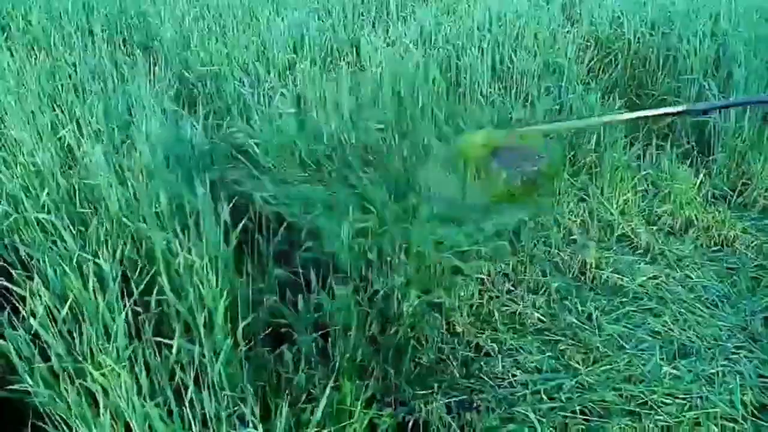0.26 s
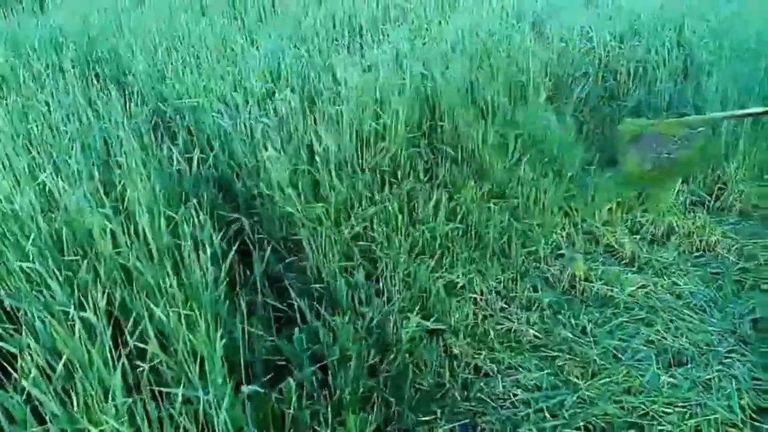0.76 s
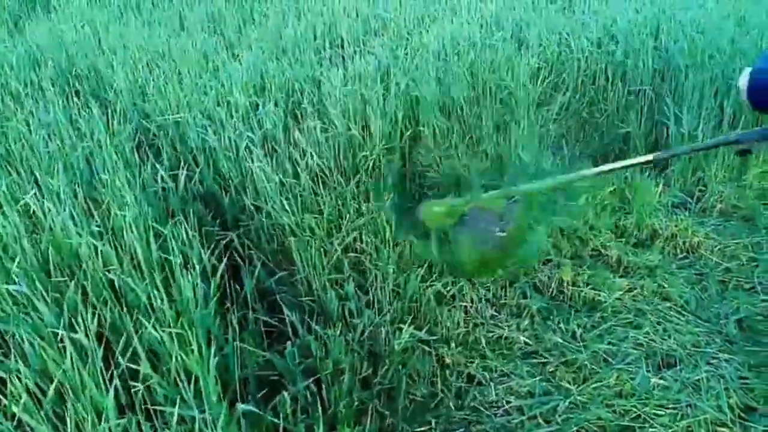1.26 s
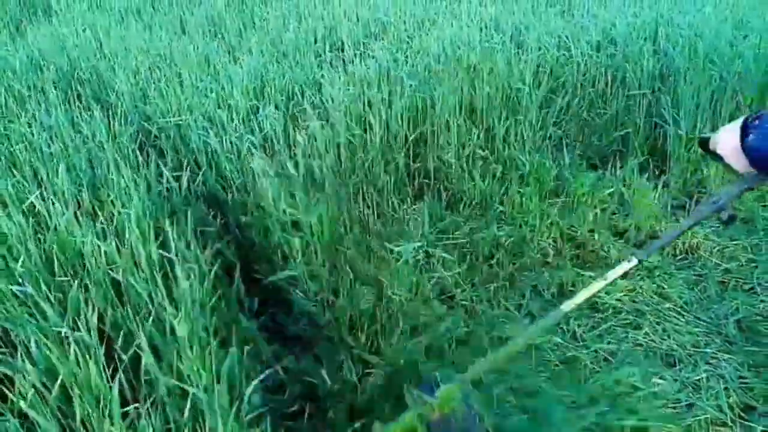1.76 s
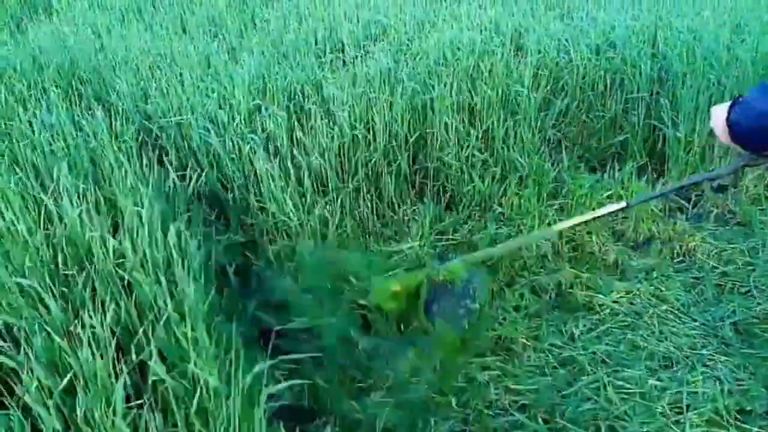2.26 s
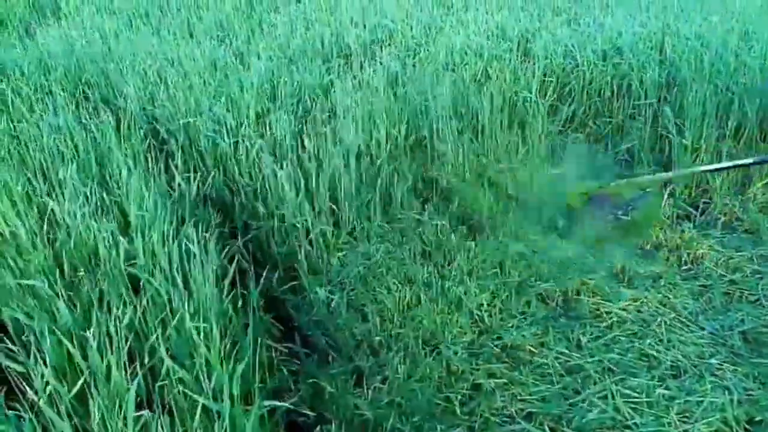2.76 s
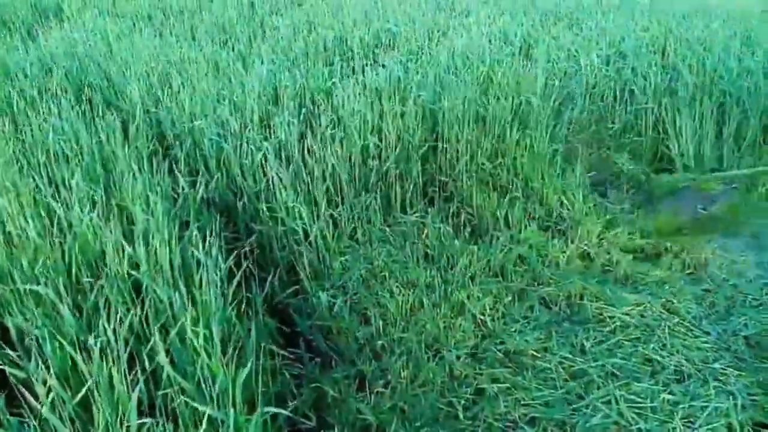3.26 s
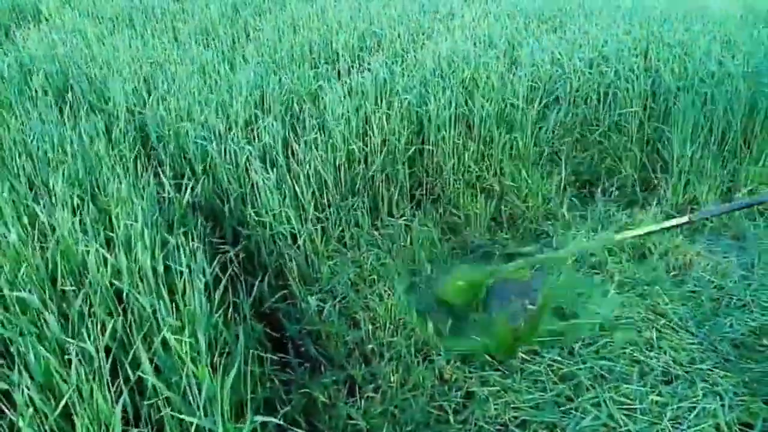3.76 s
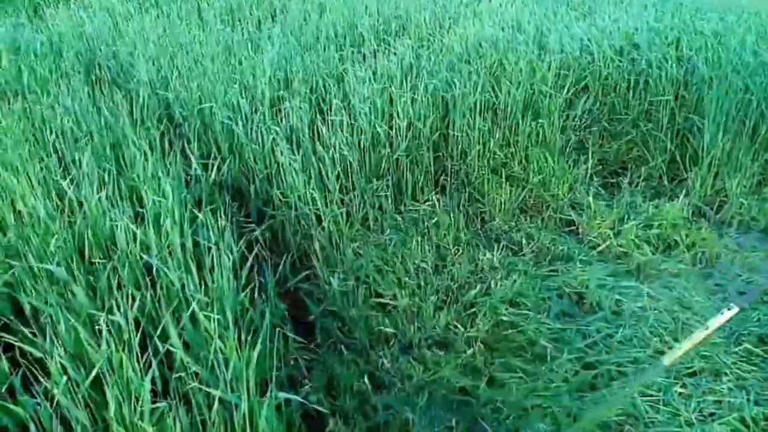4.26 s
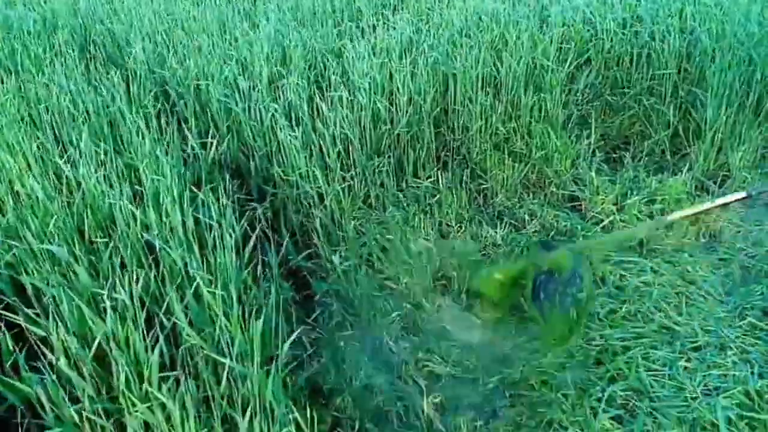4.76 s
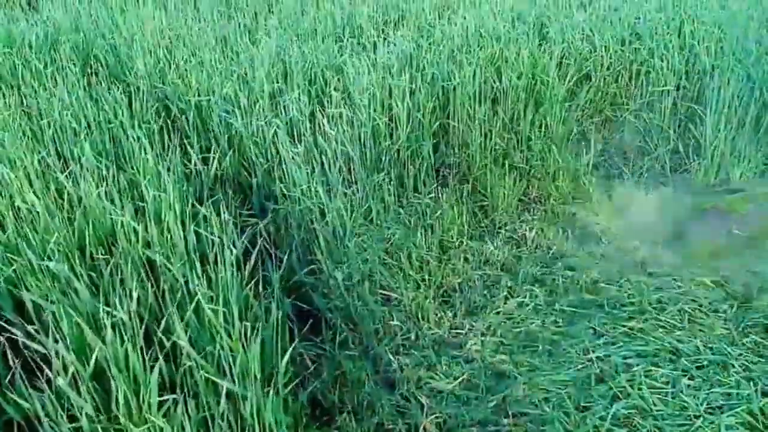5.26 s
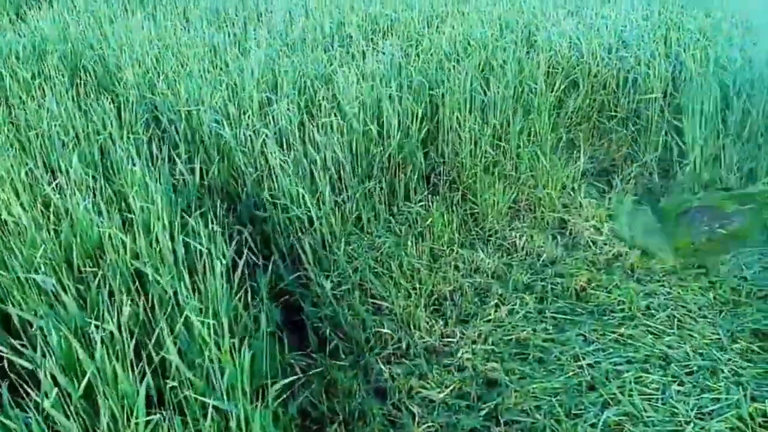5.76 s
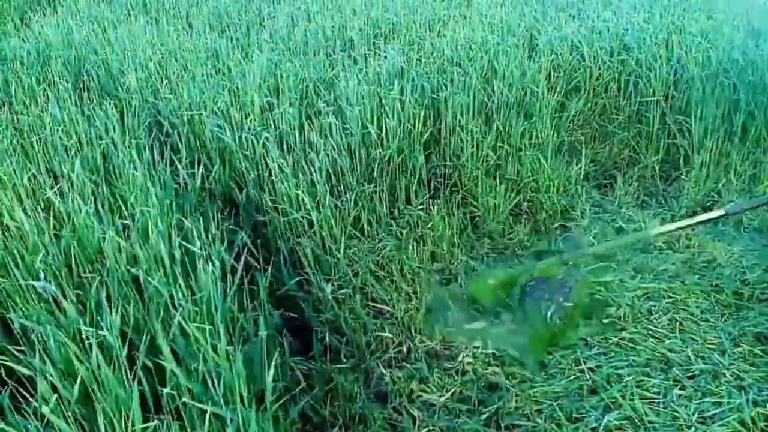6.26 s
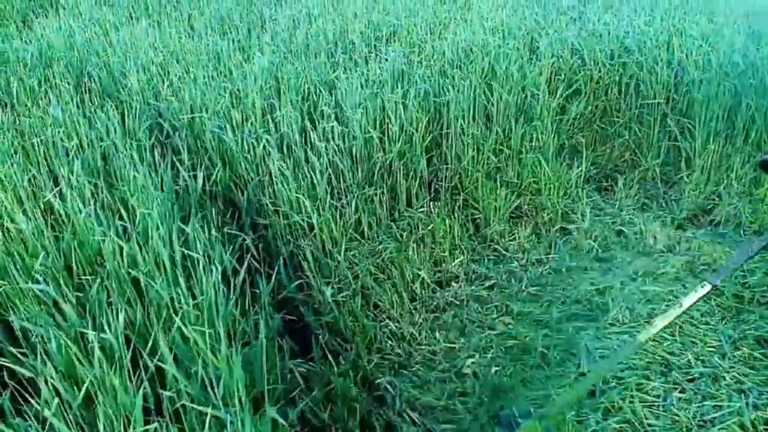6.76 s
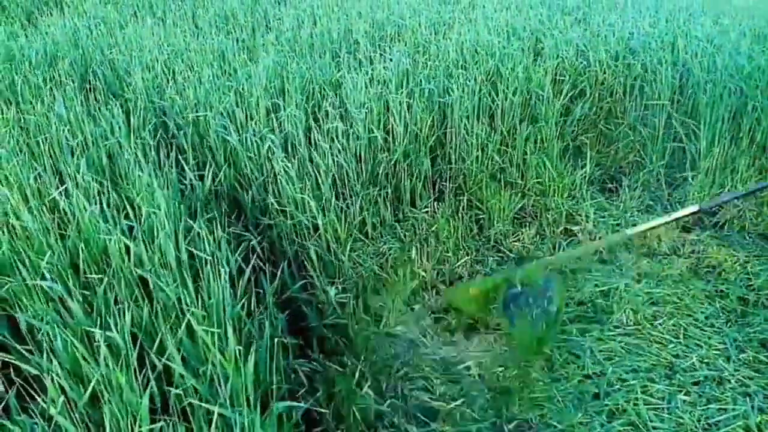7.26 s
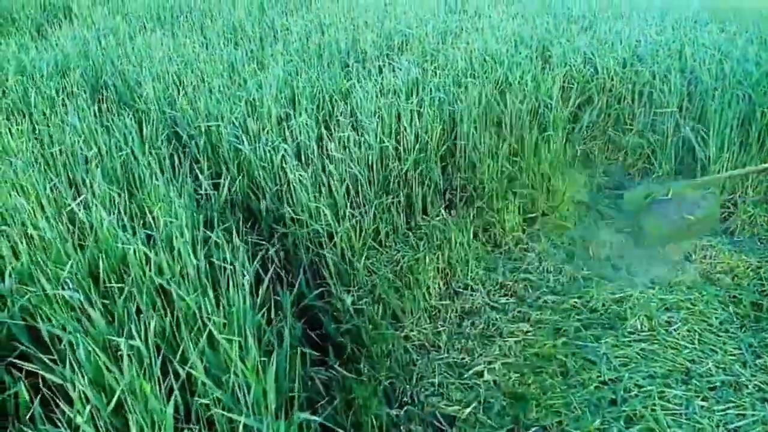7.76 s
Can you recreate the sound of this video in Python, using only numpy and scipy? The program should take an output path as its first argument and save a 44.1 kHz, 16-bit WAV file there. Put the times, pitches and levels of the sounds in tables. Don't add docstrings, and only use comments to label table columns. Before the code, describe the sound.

An electric string trimmer sweeps through tall wet grass, a throbbing bright hiss over a wavering hum, with scraps ticking and thumping close to the microphone.

```python
import sys
import numpy as np
from scipy import signal
from scipy.io import wavfile
from scipy.ndimage import uniform_filter1d

SR = 44100
rng = np.random.default_rng(int(sys.argv[2]) if len(sys.argv) > 2 else 0)


def to_wav(s):
    ch = np.atleast_2d(s).T
    pcm = np.round(np.clip(ch, -1, 1) * 32767)
    wavfile.write(sys.argv[1], SR, pcm.astype(np.int16))


def to_linear_factor(level_db):
    exponent = np.asarray(level_db, float) / 20
    return 10 ** exponent


N = 354123
FRAME = 512


def hiss(turns, t, near, lead, trim_db, rustle_db, pan_db):
    # pitch_hz, far_level [dB per Hz], near_level [dB per Hz]
    left_colour = [(40, -113, -92), (96, -70, -87), (390, -75, -65), (1100, -73.5, -69.5), (2110, -67, -60),
                   (2630, -70.5, -60), (4190, -67, -60.5), (5500, -66, -63), (6440, -66, -51),
                   (6630, -70.5, -58), (9460, -67.5, -62), (10180, -70, -70.5), (12100, -100, -87.5),
                   (16000, -110.5, -113)]
    right_colour = [(40.3, -115, -92), (101.5, -62, -60), (460, -71.5, -62.5), (1150, -70.5, -64.5),
                    (1950, -65.5, -60.5), (3810, -65.5, -59), (5240, -60, -50), (5800, -60.5, -50),
                    (6480, -57, -50.5), (7320, -62.5, -58), (8770, -61, -55.5), (10330, -69, -63.5),
                    (13740, -70, -64.5), (14930, -57.5, -54.5)]
    # pitch_hz, far_likeness [0-1], near_likeness [0-1], far_twist_rad
    likeness = [(60, .5, .5, 0), (300, .75, .7, 0), (1500, .78, .7, -.3), (2300, .65, .72, -1.4),
                (2950, .4, .6, .3), (3400, .4, .35, .6), (4300, .62, .42, 1), (5000, .62, .4, 0),
                (6300, .55, .45, -1), (7000, .3, .25, 0), (8000, .58, .15, 1), (9800, .45, .1, -.5)]
    # pitch_hz, share [0-1]
    throb_share = [(300, 0.75), (2200, 0.21), (5500, 0.38), (9000, 0.47), (12000, 0), (15000, 0.4)]
    # far_hz, near_hz, width_hz, level_db
    left_shadows = [(3200, 3300, 160, -5), (6950, 8200, 350, -7), (2700, 4700, 250, -4)]
    right_shadows = [(4300, 3200, 600, -3), (5700, 7500, 400, -3), (10100, 10600, 350, -3),
                     (12100, 13600, 500, -3)]
    lead_low, lead_high = 34, 43

    noise = rng.standard_normal((4, N))
    gate = lashes(turns, near)
    f, s, z = to_spectrum(np.array([noise[0], noise[1] * gate, noise[2], noise[3] * early(gate, lead)]))
    hz = f[:, None]
    throb = np.clip(across(throb_share, f), 0, 1)
    right = np.sqrt(1 - throb) * z[0] + np.sqrt(throb) * z[1]
    left_own = np.sqrt(1 - throb) * z[2] + np.sqrt(throb) * z[3]

    def at_frames(curve):
        return np.interp(s, t, curve)[None]

    swung = at_frames((lead - lead_low) / (lead_high - lead_low))
    far_alike, near_alike = across(likeness, f), across(likeness, f, column=2)
    alike = np.clip(far_alike + swung * (near_alike - far_alike), 0, 1)
    phase = 2 * np.pi * hz * at_frames(lead) / SR + (1 - swung) * across(likeness, f, column=3)
    left = alike * right * np.exp(1j * phase) + np.sqrt(1 - alike ** 2) * left_own

    low = 1 / (1 + (hz / 2200) ** 4)
    airy = 1 / (1 + (7000 / (hz + 1)) ** 6)
    swell = at_frames(trim_db) + (low * 0.89 - airy * 0.13) * at_frames(rustle_db - rustle_db.mean())
    band = np.minimum(np.log2(f / 60 + 1) * 3, 26).astype(int)
    swell = swell + 1.1 * walk(80, (1, len(s))) + 1.4 * walk(70, (27, len(s)))[band]
    sway = (0.5 - low) * at_frames(pan_db - pan_db.mean())

    def at_microphone(side, colour_table, shadows, lean):
        far, close = across(colour_table, f), across(colour_table, f, column=2)
        colour = far + at_frames(near) * (close - far)
        for far_hz, near_hz, width_hz, db in shadows:
            centre_hz = far_hz + swung * (near_hz - far_hz)
            colour = colour + db * np.exp(-((hz - centre_hz) / width_hz) ** 2)
        flicker = 0.9 * walk(50, (27, len(s)))[band]
        return side * to_linear_factor(colour + swell + flicker + lean * sway)

    both = np.array([at_microphone(left, left_colour, left_shadows, lean=0.5),
                     at_microphone(right, right_colour, right_shadows, lean=-0.25)])
    return to_sound(both) * np.sqrt(SR / 2)


def lashes(turns, near):
    passes = np.floor(turns).astype(int)
    bunch = np.minimum(rng.exponential(size=passes.max() + 1), 3)
    strength = to_linear_factor(2.8 * bunch[passes] + 1.2 * (passes % 2))
    sharp = np.clip(1.8 - 0.94 * near, 0, 8)
    place = (turns - passes) ** 0.8
    gate = strength * np.exp(-sharp * np.cos(2 * np.pi * place))
    return gate / np.sqrt(uniform_filter1d(gate ** 2, 8000))


def hum(turns, lead, hum_db):
    partials = [
        (.5, -16.5),
        (1, 0),
        (2, -23.5),
    ]
    tone = np.zeros(N)
    for multiple, db in partials:
        level = to_linear_factor(db + wobble(500, 0.87 / multiple))
        shake = wobble(400, 0.12 / multiple ** 2)
        tone += level * np.sin(2 * np.pi * multiple * turns + shake)
    tone *= np.sqrt(2) * to_linear_factor(hum_db)
    return np.array([to_linear_factor(-1.5) * early(tone, lead), to_linear_factor(2.5) * tone])


def whine(turns, lead, whine_db):
    tone = np.sin(2 * np.pi * 10 * turns + wobble(260, 0.6)) * to_linear_factor(whine_db + wobble(300, 3))
    return np.array([to_linear_factor(-2) * early(tone, lead), tone])


def scraps(lead):
    # start_s, level_db, contact_ms, sign
    left_taps = [(0.0343, -20, 3.2, -1), (0.0831, -22, 0.61, 1), (1.4906, -13, 0.86, -1),
                 (1.6601, -28, 0.3, -1), (1.7426, -13.5, 0.53, 1), (2.2085, -20, 1, -1),
                 (2.4438, -22, 0.51, -1), (2.5658, -16.5, 0.6, -1), (3.8215, -18, 0.65, -1),
                 (4.0727, -22.0, 3, -1), (4.0876, -18, 1.6, -1), (4.1202, -19.0, 0.34, -1),
                 (4.29, -9, 1.3, 1), (4.5723, -16.5, 1.4, -1), (5.1842, -34, 0.3, -1),
                 (6.9959, -17, 1.3, -1), (7.1213, -14, 0.96, -1), (7.2425, -24, 0.34, -1),
                 (7.5587, -7, 1.06, -1), (7.6908, -14, 0.92, 1), (7.8403, -6, 1.09, 1)]
    right_slaps = [(0.09, -17, 1.3, 1), (0.4285, -19, 0.52, -1), (0.6228, -18, 0.31, -1),
                   (.8602, -5.5, 0.09, -1), (1.4919, -5, 2, -1), (1.499, -13, .73, 1),
                   (1.727, -15, 0.57, -1), (2.2699, -20, 0.31, -1), (3.051, -14, 0.3, -1),
                   (3.4131, -10, 0.2, -1), (4.09, -11, 1.6, -1), (4.1208, -5, 0.56, -1),
                   (4.1296, -9, 3.1, -1), (4.1911, -10, 0.16, 1), (4.4805, -16, 0.43, -1),
                   (4.7062, -22, 1.2, -1), (4.903, -16, .51, -1), (5.099, -12, .12, 1),
                   (5.1851, -14.5, 0.35, -1), (5.4232, -9, 0.26, 1), (5.5825, -14.5, .094, 1),
                   (5.84, -14, .59, -1), (5.9776, -14, 0.22, -1), (6.4348, -13.5, .12, 1),
                   (6.5056, -10.5, .13, 1), (6.5947, -13, 0.77, -1), (7.56, -4, 1.8, -1),
                   (7.6176, -12.5, 0.3, -1), (7.6916, -5, 0.59, -1), (7.8405, -9.5, 1.22, -1)]
    # start_s, level_db
    right_specks = [(.0759, -14), (0.366, -14), (0.3743, -15), (1.0222, -11), (1.0919, -9), (2.4442, -12.5),
                    (2.5126, -14), (2.5978, -14), (2.8526, -9), (3.0014, -15), (3.7634, -11.5),
                    (3.874, -11.5), (4.0153, -9.5), (4.0987, -6), (4.1777, -8.5), (4.203, -9), (4.2908, -6),
                    (4.573, -8.5), (4.9953, -12), (5.0665, -9), (5.0832, -3.5), (5.0913, -7.5),
                    (5.2274, -10.5), (6.057, -12), (6.0895, -13), (6.1041, -8.5), (6.1633, -11),
                    (6.3704, -11.5), (7.1506, -7), (7.944, -18.5)]
    ticks = [(start_s, db, 0.12, 1) for start_s, db in right_specks]
    left = taps(left_taps, small_db=-43.0)
    right = taps(ticks + list(right_slaps), small_db=-25.5)
    return np.array([left + to_linear_factor(-26) * early(right, lead), right])


def taps(hits, small_db):
    out, t = np.zeros(N + 1024), np.arange(1024) / SR
    chance = rng.random((260, 2))
    drizzle = [(a * N / SR, small_db + 9 * b ** 2, 0.12, 1) for a, b in chance]
    for start_s, db, contact_ms, sign in list(hits) + drizzle:
        u = t / (max(contact_ms, 0.04) / 1000)
        start = int(start_s * SR)
        out[start:start + 1024] += np.sign(sign) * to_linear_factor(db) * u * np.exp(1 - u)
    return signal.sosfilt(signal.butter(2, 110, "high", fs=SR, output="sos"), out[:N])


def swing(t):
    # start_s, passes_hz
    speed_stretches = [
        [(0, 210.7), (.24, 192), (.78, 237), (1.27, 196), (1.77, 207), (1.93, 230), (2.07, 241), (2.24, 207),
         (2.44, 168)],
        [(2.64, 186), (3.09, 201), (3.35, 233), (3.5, 212), (3.7, 172), (3.84, 182), (3.98, 212), (4.22, 202.3),
         (4.45, 234)],
        [(4.55, 207), (4.65, 174), (4.83, 174), (5.05, 203), (5.16, 200.7), (5.32, 168.8), (5.45, 187.7),
         (5.65, 229), (6.05, 185)],
        [(6.33, 199), (6.69, 199), (6.88, 235.5), (7.02, 244.4), (7.13, 225.2), (7.24, 190), (7.52, 211),
         (7.65, 201), (7.95, 237)],
    ]
    # start_s, level_db [hiss at the usual speed]
    reach = [(0, -23.5), (.25, -29), (.6, -29.5), (1.1, -28.5), (1.36, -25), (1.8, -18.5), (2.2, -21),
             (2.36, -30.5), (3.2, -30), (3.85, -25.5), (4.0, -20), (4.6, -20), (4.72, -26.5), (5.3, -31.5),
             (6.2, -27), (6.7, -19), (7.15, -20), (7.26, -29)]
    # start_s, lead [samples by which the left side hears earlier]
    bearing = [(0, 42.8), (.7, 34.1), (1, 36.4), (1.5, 43.3), (2.4, 41.4), (2.85, 33.7), (3.3, 33.5),
               (3.9, 41.8), (4.65, 40.2), (5.4, 32.2), (5.7, 33.63), (6.55, 40.8), (7.1, 41.6),
               (7.75, 33.2), (8.03, 35.2)]
    hz = uniform_filter1d(np.interp(t, *np.vstack(speed_stretches).T), 1800)
    reach_db = uniform_filter1d(np.interp(t, *np.transpose(reach)), 2000)
    lead = uniform_filter1d(np.interp(t, *np.transpose(bearing)), 6000)
    return hz, reach_db, lead


def early(x, lead):
    return np.interp(np.arange(N) + lead, np.arange(N), x)


def wobble(span, size):
    x = uniform_filter1d(uniform_filter1d(rng.standard_normal(N), span), span)
    return size * x / x.std()


def walk(rate, shape):
    hold = max(int(4 * SR / FRAME / rate), 1)
    steps = np.repeat(rng.standard_normal((shape[0], shape[1] // hold + 1)), hold, axis=1)
    steps = uniform_filter1d(steps, hold, axis=1)[:, :shape[1]]
    steps = steps - uniform_filter1d(steps, 16 * hold, axis=1)
    return steps / steps.std()


def to_spectrum(x, size=FRAME):
    return signal.stft(x, SR, nperseg=size, noverlap=size * 3 // 4)


def to_sound(z, size=FRAME):
    return signal.istft(z, SR, nperseg=size, noverlap=size * 3 // 4)[1][..., :N]


def across(table, hz, column=1):
    table = np.array(table, float)
    return np.interp(np.log(hz + 1), np.log(table[:, 0]), table[:, column])[:, None]


def scene():
    t = np.arange(N) / SR
    hz, reach_db, lead = swing(t)
    turns = np.cumsum(hz) / SR
    fast = hz - 200
    spin_up = np.gradient(hz) * SR
    load = -fast - 0.088 * uniform_filter1d(spin_up, 4000)

    far_db, near_db = -28, -19
    hiss_db = reach_db + 0.0409 * fast
    near = np.clip((hiss_db - far_db) / (near_db - far_db) + 0.028, -0.3, 1.3)
    trim_db = hiss_db - far_db - near * (near_db - far_db)
    grass = hiss(turns, t, near, lead, trim_db, rustle_db=0.1062 * load, pan_db=wobble(3000, 7))

    hum_db = -40.5 + 0.1446 * fast + 0.0047 * np.minimum(spin_up, 0)
    close = np.clip(near, 0, 1)
    whine_db = -43 + close * (5 + 0.22 * fast) - (1 - close) * 0.2 * fast
    motor = hum(turns, lead, hum_db) + whine(turns, lead, whine_db)
    return grass + motor + scraps(lead)


def masked(x):
    # pitch_hz, left_db and right_db [under the loudness of the moment], sum_db [under the difference]
    limits = [(1500, -40, -40, -12), (2300, -19, -19, -9), (2600, -12, -12.5, -3.5),
              (4000, -11.5, -11, -2.5), (4600, -12.5, -14, -3.5), (5200, -14, -16, -6),
              (7000, -12.5, -18, -9), (10300, -12, -12, -40), (13700, -12, -13, -40),
              (14300, -36, -30, -40)]
    hz, s, z = to_spectrum(x, size=1024)
    z, hz = z[:, :512], hz[2:512:4]

    def bands(v):
        power = (np.abs(v) ** 2).reshape(128, 4, -1).mean(axis=1)
        return uniform_filter1d(power, 7, axis=1)

    def wide(v):
        return np.repeat(bands(v).reshape(64, 2, -1).mean(axis=1), 2, axis=0)

    def limit(column):
        return to_linear_factor(across(limits, hz, column=column)) ** 2

    loud = uniform_filter1d(bands(z[1])[26:56].mean(axis=0), 9)
    mid, side = (z[0] + z[1]) / 2, (z[0] - z[1]) / 2
    hollow = wide(mid) < wide(side) * limit(3)
    mid = mid * np.repeat(~hollow, 4, axis=0)
    out = []
    for column, v in ((1, mid + side), (2, mid - side)):
        heard = bands(v) > loud * limit(column)
        out.append(v * np.repeat(heard, 4, axis=0))
    return to_sound(np.pad(out, ((0, 0), (0, 1), (0, 0))), size=1024)


def top_cut(x):
    return signal.sosfilt(signal.butter(12, 16870, fs=SR, output="sos"), x)


def record(dry):
    thin = signal.sosfilt(signal.butter(2, 62, "high", fs=SR, output="sos"), dry)
    kept = masked(np.tanh(thin))
    mix = signal.sosfilt(signal.ellip(12, 0.2, 60, 15450, fs=SR, output="sos"), kept)
    return top_cut(mix)


dry = scene()
out = record(dry)
to_wav(out)
```